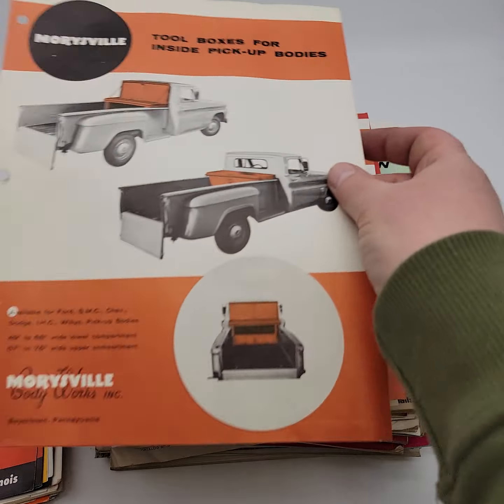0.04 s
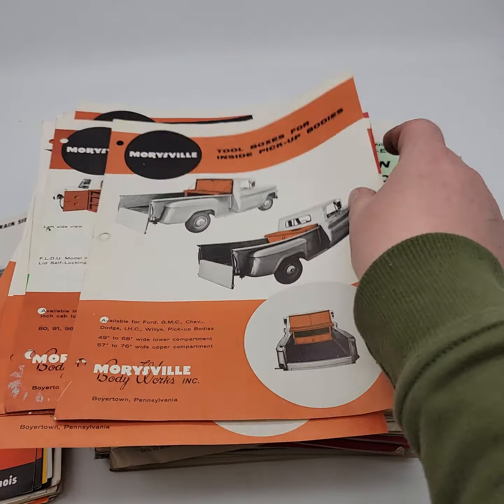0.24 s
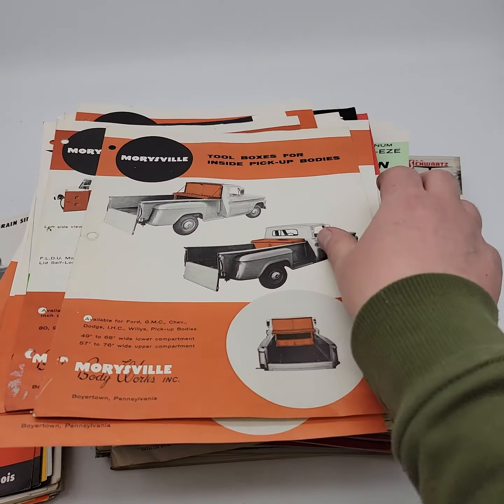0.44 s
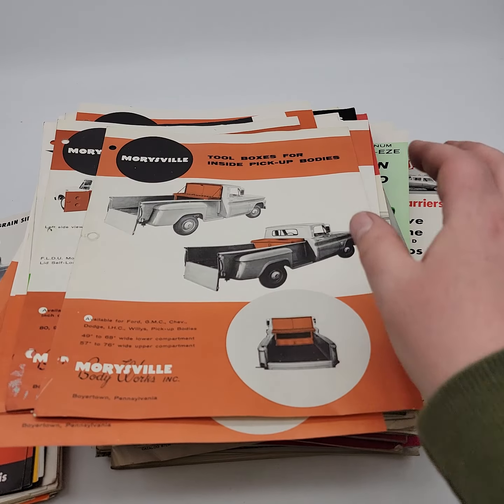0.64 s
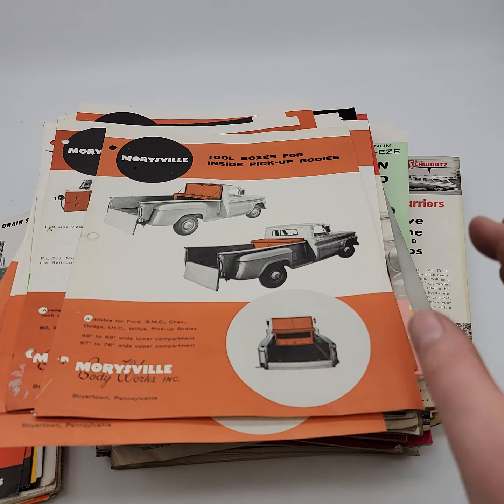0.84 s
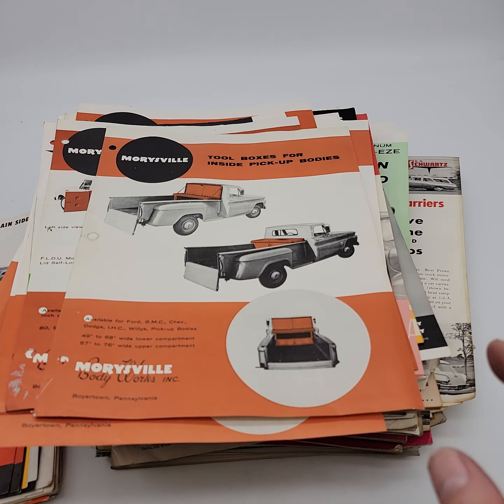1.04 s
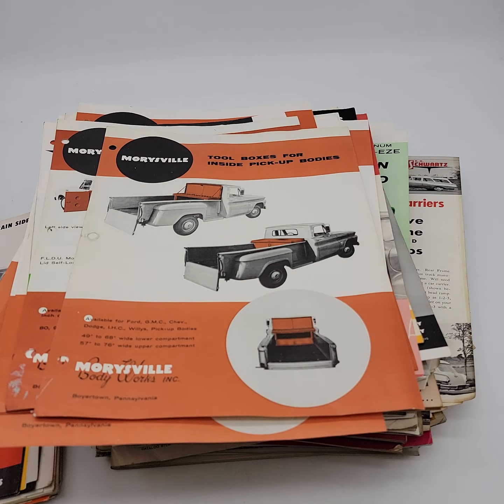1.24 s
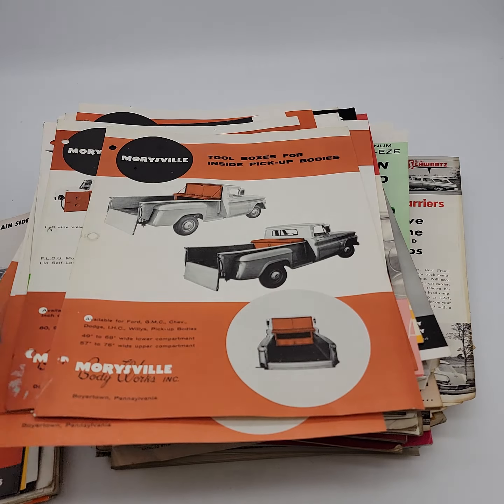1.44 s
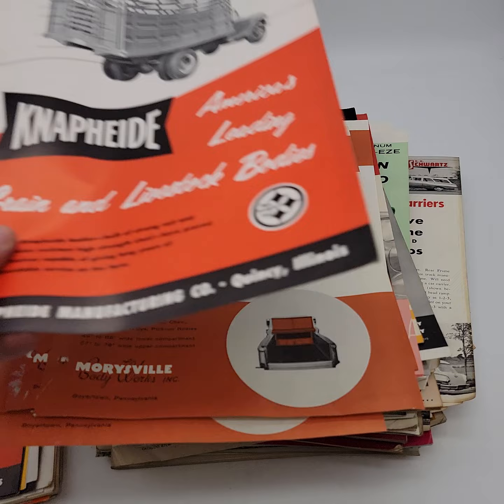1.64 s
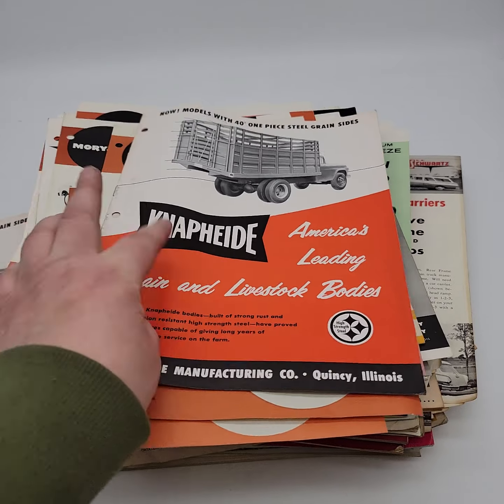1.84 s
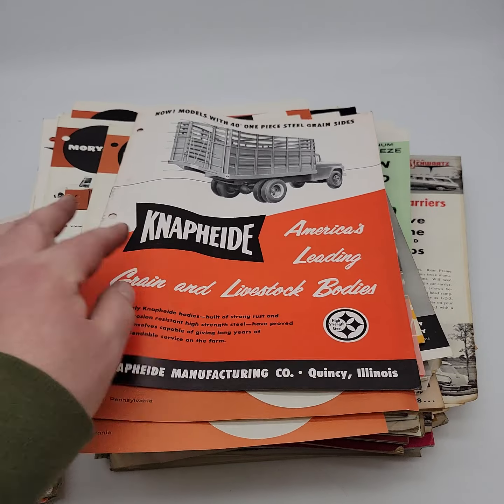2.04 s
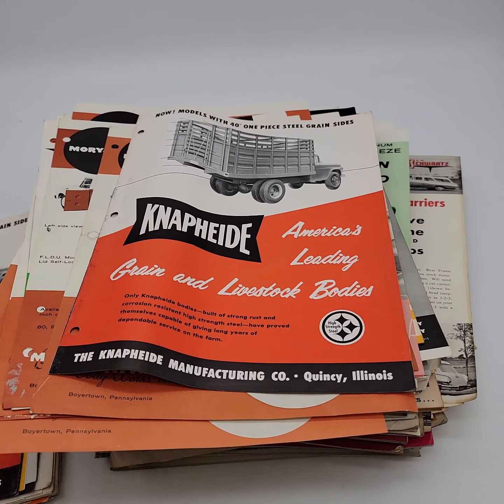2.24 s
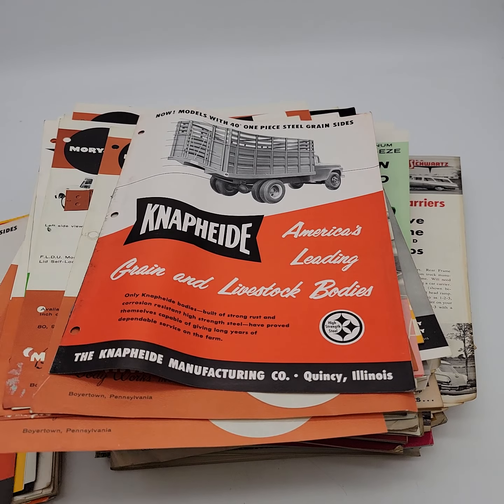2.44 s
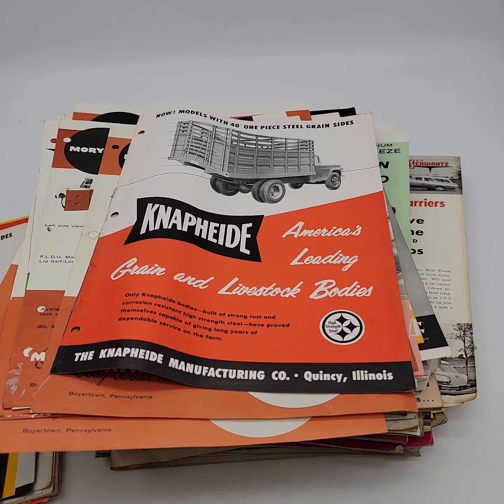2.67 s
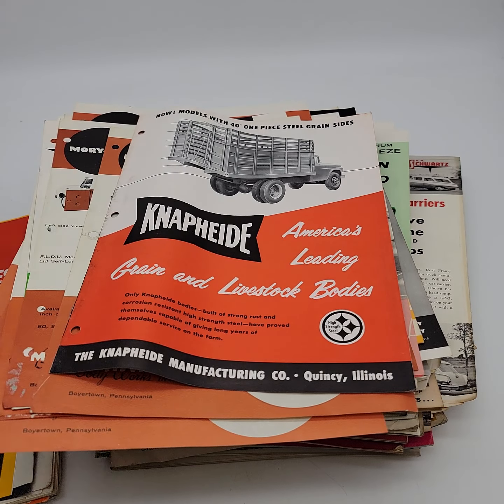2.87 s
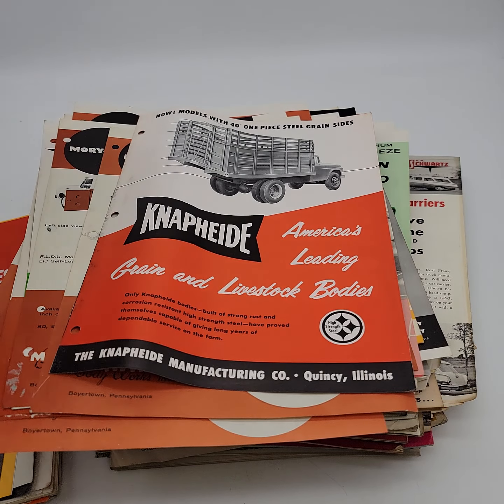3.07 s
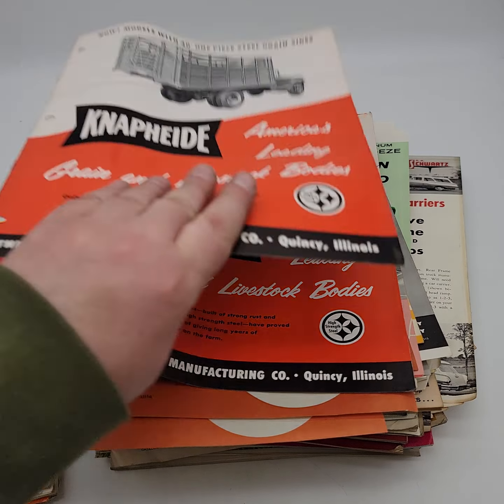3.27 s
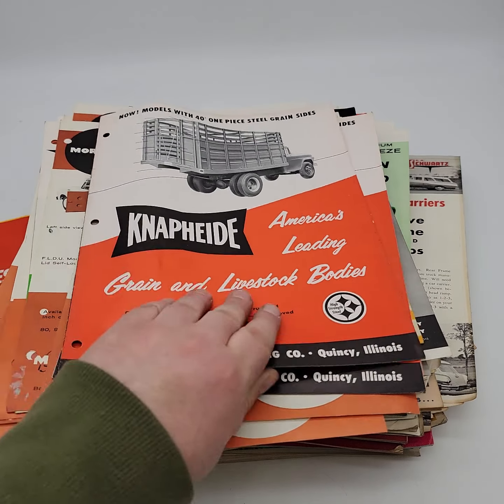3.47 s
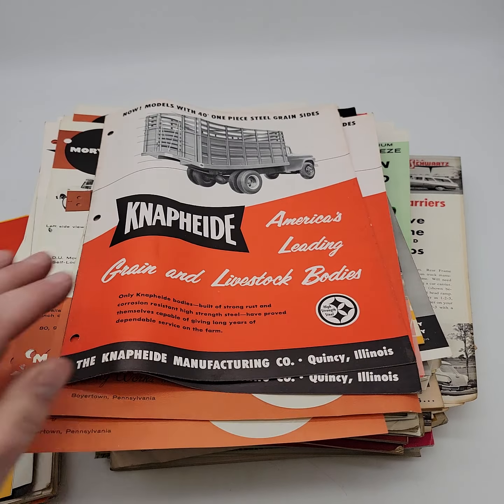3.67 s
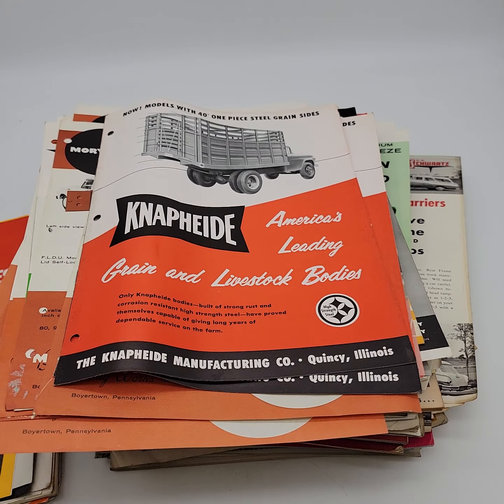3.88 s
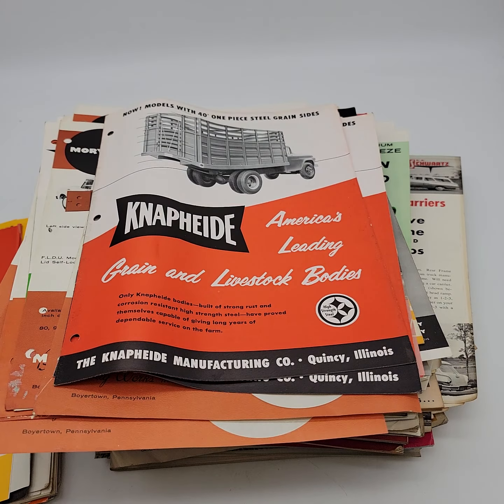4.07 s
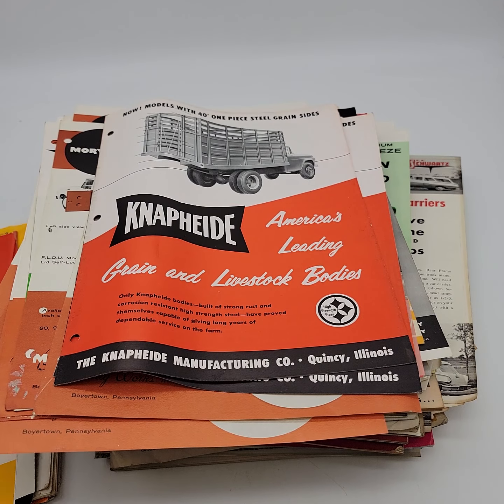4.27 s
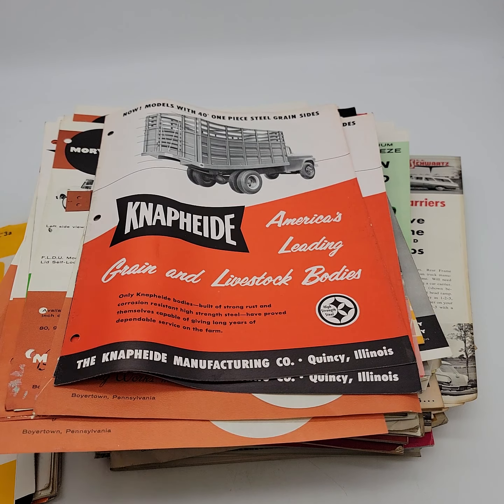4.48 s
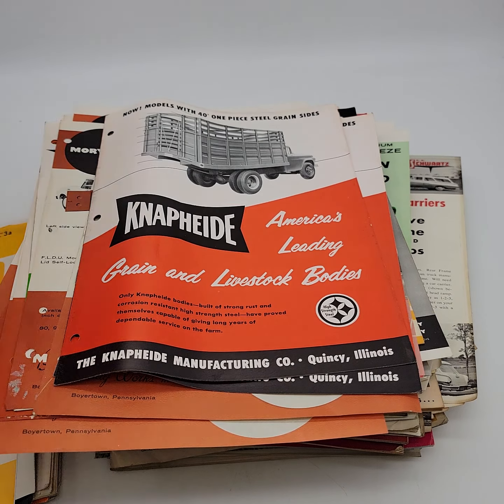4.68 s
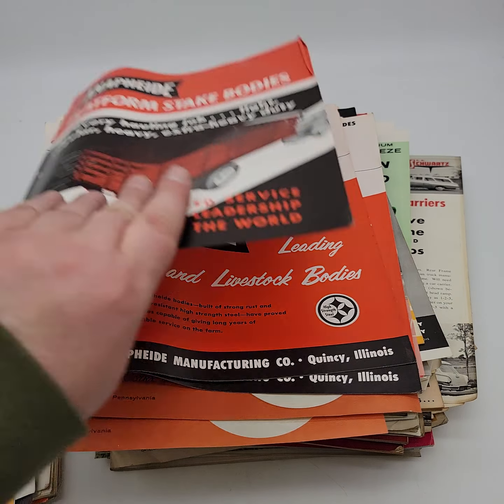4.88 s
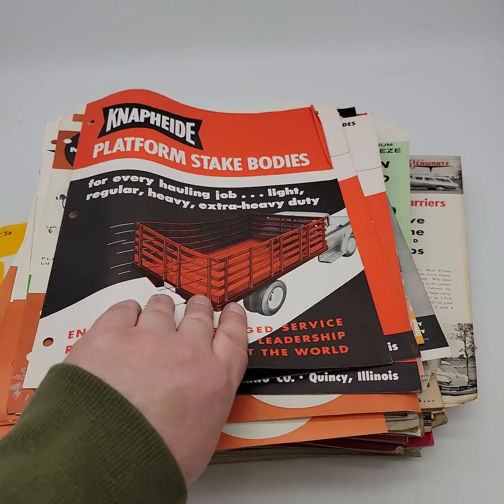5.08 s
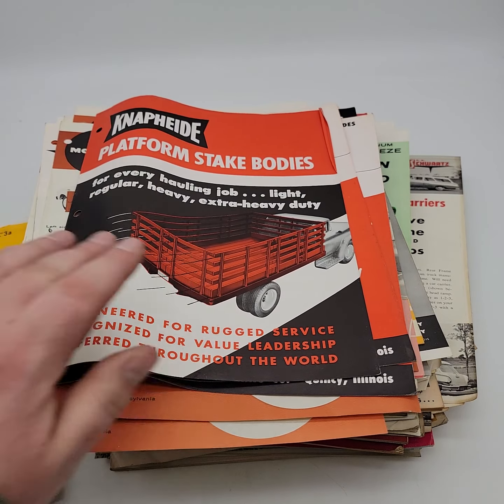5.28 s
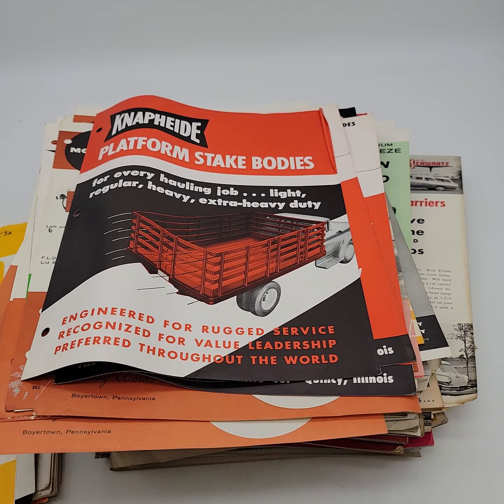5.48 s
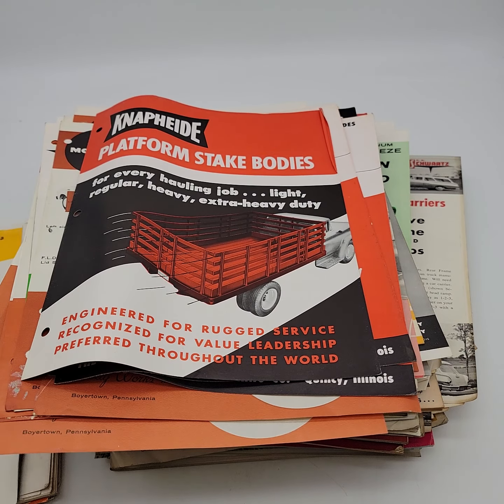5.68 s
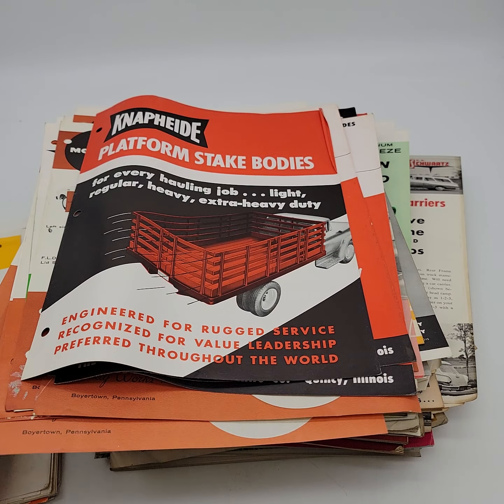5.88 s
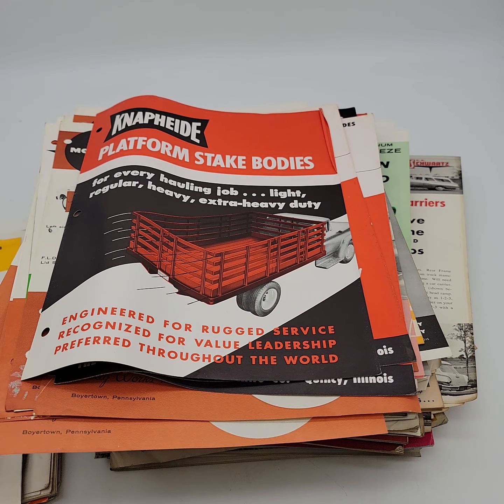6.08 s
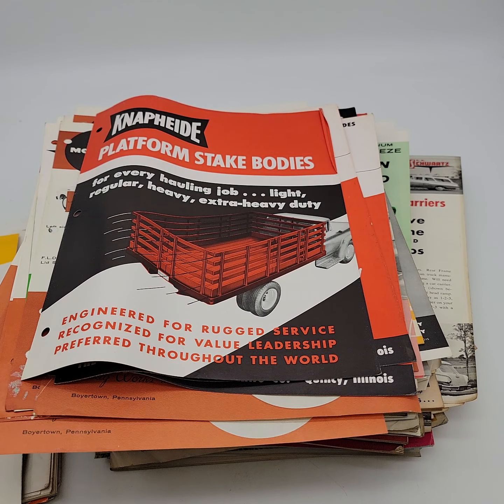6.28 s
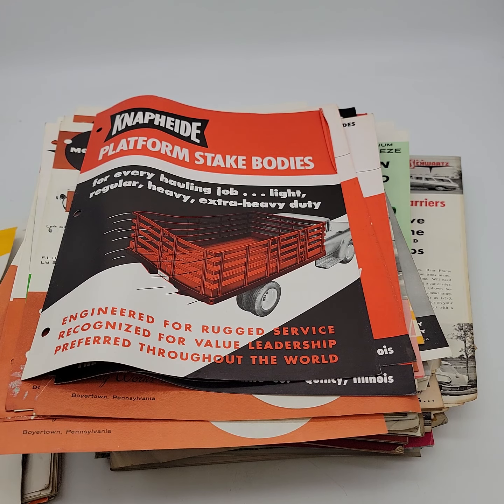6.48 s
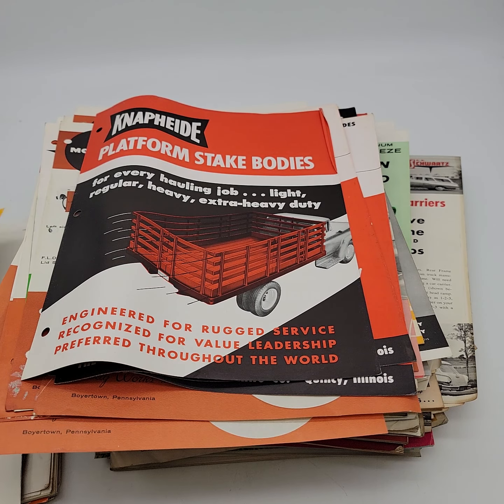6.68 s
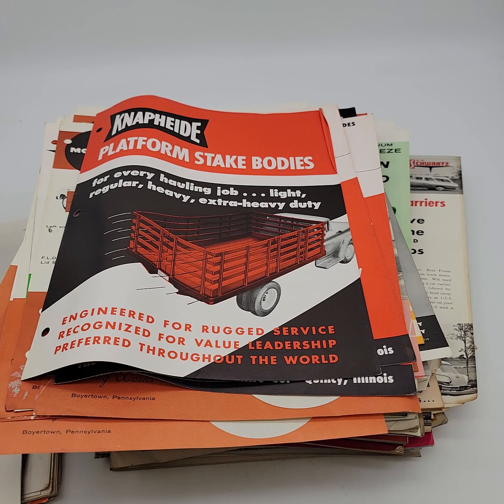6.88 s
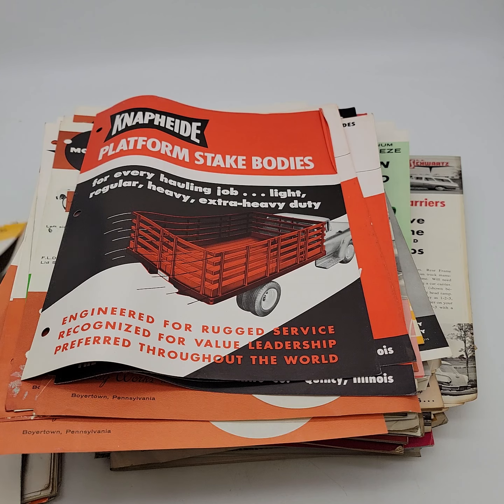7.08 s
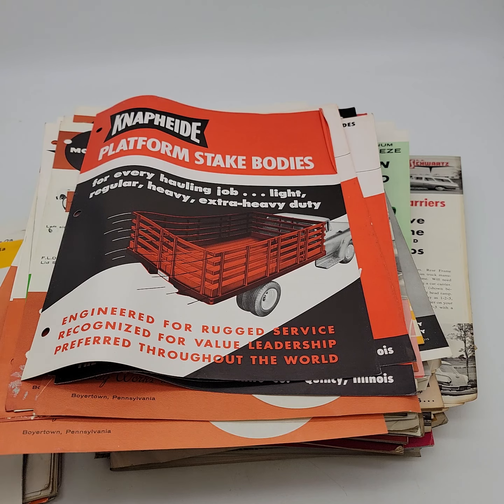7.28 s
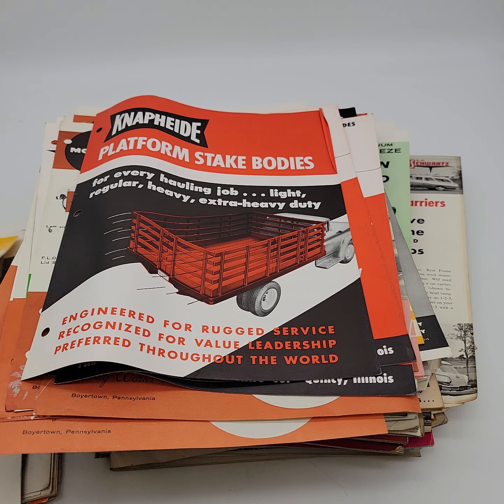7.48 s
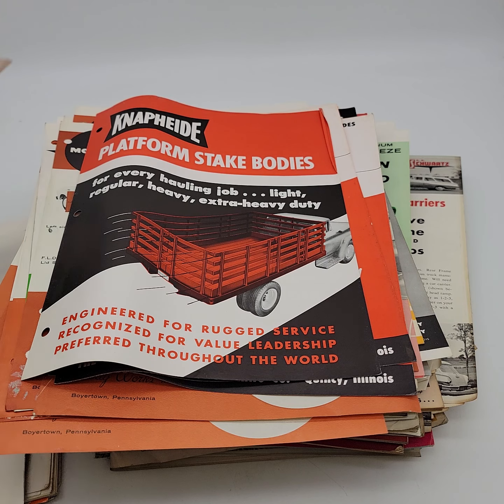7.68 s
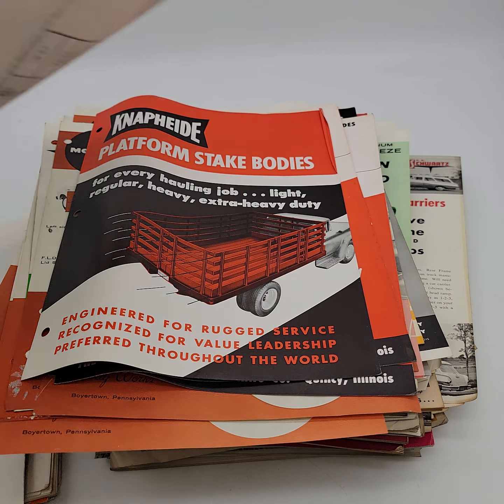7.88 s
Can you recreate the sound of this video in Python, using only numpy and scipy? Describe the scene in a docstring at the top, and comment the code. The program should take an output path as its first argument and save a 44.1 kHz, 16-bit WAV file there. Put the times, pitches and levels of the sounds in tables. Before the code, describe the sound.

Close paper handling indoors: dry sheets hiss and crackle, buckle with crisp snaps, pat down softly, and keep sliding over a faint low rumble.

```python
"""Stiff old paper brochures are picked up, flexed and laid on a pile on a table in a quiet room.
From the start sheets slide with a fine hiss (noise swelling and fading in strokes), buckle with snaps
(noise bursts around a sheet pitch) and pat down with soft thumps (low puffs), over a low rumble and faint hum.
The sharpest snaps come near 2.1 and 3.6 s; from 2.0 to 5.7 s something small and hard ticks now and then
(clicks with ringing modes). Sliding and weaker buckles go on to the end; snaps and ticks echo in the room."""
import sys
import numpy as np
from scipy import signal
from scipy.fft import rfft, irfft
from scipy.io import wavfile

SR = 44100
rng = np.random.default_rng(int(sys.argv[2]) if len(sys.argv) > 2 else 0)


def unload_wav(signal):
    """Save mono or channel-first audio to the path in sys.argv[1] as 16-bit WAV at rate SR, clipped to [-1, 1]."""
    wavfile.write(
        sys.argv[1],
        SR,
        np.round(np.clip(np.atleast_2d(signal).T, -1, 1) * 32767).astype(np.int16),
    )


N = 349272

# Spectrum of the room tone: (frequency [Hz], relative level [dB])
ROOM_SPECTRUM = [(18, -46), (30, -27), (60, -8.5), (85, -9.5), (150, -19), (300, -21.5), (500, -32.5),
                 (900, -33), (2000, -34.5), (5000, -36), (7500, -38), (8300, -46.5), (11000, -43),
                 (13300, -33), (16000, -42.5)]
# Faint wavering hum: (mean frequency [Hz], middle rms level [dB])
HUM_TONES = [(121, -78), (240, -84)]
# Correlation between the sides in the wide noises: (frequency [Hz], correlation [-1 to 1])
SIDE_CORRELATION = [(60, 1), (180, 0.68), (550, 0.98), (1650, 0.047), (4970, 0.19), (15000, -0.12)]
# Small hard ticks: (time [s], relative click level [dB], relative drive of the highest mode [dB])
TICK_EVENTS = [(1.9704, -55.5, -15), (2.3085, -54.5, -5), (3.6736, -53.5, -11), (3.7479, -52, 2),
               (4.0652, -51.5, -4), (5.3954, -59, 1.5), (5.7184, -53.5, -4)]
# Modes that a tick sets ringing: (frequency [Hz], relative level [dB], 60 dB decay time [s])
TICK_MODES = [(239, -10.5, 0.86), (547, -13, 0.19), (3233, 0, 0.058), (9050, -19, 0.08)]
# Spectrum of sliding paper: (frequency [Hz], relative level [dB])
SLIDE_SPECTRUM = [(650, -36), (1100, -13), (1500, -9), (2000, -6.5), (3200, -7.5), (4300, -7), (5200, -14),
                  (6500, -31.5)]
# Spectrum of the finest hiss: (frequency [Hz], relative level [dB])
FINE_SPECTRUM = [(4000, -33.5), (5200, -3.5), (7300, -1.5), (8200, -10.5), (10000, -9), (13000, -6.5),
                 (16000, -2.5)]
# Spectrum of flexing paper: (frequency [Hz], relative level [dB])
FLEX_SPECTRUM = [(120, -11.5), (250, -5), (500, 6), (900, -4.5), (1500, -10.5), (2500, -33.5)]
# Strokes of a sheet over another: (start [s], length [s], sliding hiss level [dB], finest hiss level [dB],
# flexing rustle level [dB], swell from start to end [dB], left over right [dB])
STROKES = [(0.0, 0.039, -69, -81, -48.5, -31, -2), (0.046, 0.22, -60, -62.5, -58.5, 6, 0.5),
           (0.281, 0.055, -58, -64, -74, 4, 1), (.33, 0.097, -55.5, -55.5, -63.5, -7.5, -0.5),
           (0.414, 0.12, -69, -65, -63.5, -12, -3), (0.51, 0.12, -63, -65.5, -72, 4, -3),
           (0.653, 0.043, -70, -66, -83, -6, -2), (0.76, .11, -68, -68, -64.5, -4, -3),
           (0.969, .07, -59, -59, -67.5, -1, -2.5), (1.037, 0.21, -50.5, -54.5, -61, 4.5, -0.5),
           (1.269, 0.037, -72, -63, -59, 14, -1), (1.33, 0.12, -80, -94, -64, -23, -5),
           (1.469, 0.12, -68, -68.5, -70, -14, -1), (1.703, 0.078, -60, -60, -61.5, 0, 2),
           (1.796, 0.12, -56, -57, -53, -12, -7.5), (1.966, 0.086, -64, -64, -66, -8, 0),
           (2.354, .16, -59.5, -53.5, -70.5, -8.5, -0.5), (2.526, 0.25, -59.5, -57, -63, 6.5, -2.5),
           (2.743, 0.12, -55.5, -72, -59, -13, -5), (2.84, 0.12, -61.5, -60, -69, -12, 3.5),
           (3.072, 0.1, -58.5, -70, -63, 3, 1), (3.226, 0.037, -61, -67.5, -67, -1, 1),
           (3.363, 0.23, -58, -58, -63.5, 2, 2.5), (3.543, 0.24, -62, -77, -62.5, -28, -6.5),
           (3.929, 0.15, -54, -56.5, -60, -7.5, -1.5), (4.06, .15, -61, -61.5, -70.5, -1, 0),
           (4.221, .16, -62, -61, -67, 1.5, -2.5), (4.424, 0.098, -53.5, -56.5, -72.5, 7.5, -1.5),
           (4.547, 0.14, -74, -76.5, -75.5, -4.5, -5), (4.859, .07, -71, -70, -82, 4.5, 2.5),
           (4.937, 0.18, -64.5, -56.5, -59, 0.5, 1), (5.13, 0.08, -53.5, -56.5, -69, 0.5, 1),
           (5.305, 0.137, -88.5, -88, -67, 3, -2), (5.567, 0.1, -54, -53.5, -64.5, -5, 0.5),
           (5.688, 0.087, -63, -64, -69, -12, -1.5), (5.781, .15, -58.5, -59.5, -66, -1.5, -0.5),
           (5.933, 0.1, -68.5, -67.5, -73.5, -9, -1), (6.172, 0.17, -65, -61.5, -71.5, 4.5, -2),
           (6.304, 0.15, -55.5, -58.5, -58.5, -17.5, -2.5), (6.448, 0.19, -64, -64, -64.5, -10.5, -1.5),
           (6.623, 0.079, -56.5, -57, -75, -11, 0), (6.699, 0.144, -52, -53.5, -70, 4.5, -1),
           (6.836, 0.1, -47, -56.5, -63.5, -7, -2.5), (6.94, 0.18, -52.5, -58.5, -61.5, -16.5, 0),
           (7.126, 0.073, -53, -56.5, -69, -5, 1), (7.203, 0.17, -52.5, -56, -63, -4, -0.5),
           (7.397, 0.13, -54, -63, -62, -1, -1.5), (7.538, 0.1, -47, -49, -64, 3, 0),
           (7.671, 0.17, -67.5, -67.5, -66, -2.5, -2.5)]
# Spectrum of the crisp edge of a snap: (frequency [Hz], relative level [dB])
EDGE_SPECTRUM = [(4000, -6.5), (5200, -7.5), (7000, -6), (8500, -19.5), (11000, -23.5), (13500, -10.5),
                 (16000, -23.5)]
# Buckles and pats: (peak time [s], sheet level [dB], sheet pitch [Hz], crack level [dB], edge level [dB],
# puff level [dB], rise time [s], basic 60 dB decay time [s], left over right [dB])
BUCKLES = [(0.0843, -43, 640, -75, -76, -48.5, 0.024, 0.16, 2.5),
           (0.145, -77, 990, -52.5, -60, -75, 0.014, 0.073, -4),
           (0.2149, -34.5, 1460, -51, -67, -45, .016, .085, 0.5),
           (0.609, -52, 980, -52.5, -55, -58, 0.014, 0.046, 0),
           (0.8113, -38, 610, -46.5, -46, -54, 0.0058, 0.042, -0.5),
           (0.8687, -53, 600, -59, -69, -62, .0051, .022, -6),
           (1.1415, -30, 594, -58, -41, -39, 0.0075, 0.028, 1.5),
           (1.2253, -27, 656, -34, -42.5, -41, 0.0027, 0.047, -4.5),
           (1.2268, -26, 1540, -48, -60, -66, 0.00177, 0.032, -3),
           (1.2788, -47, 580, -74, -72, -44, 0.0032, 0.031, -2),
           (1.3256, -34.5, 1050, -57.5, -75, -38.5, 0.0087, 0.1, -1),
           (1.49, -49, 826, -79, -70, -49.5, .0027, 0.064, 2),
           (1.707, -50, 1410, -51.5, -48.5, -61, .0034, 0.063, 2.5),
           (1.7489, -39, 1530, -51, -70, -55, 0.0091, 0.071, 1.5),
           (1.8001, -41, 1170, -46.5, -43, -68, 0.015, 0.059, 3.5),
           (1.8162, -30, 1470, -54, -59, -45, 0.0056, 0.1, 2),
           (1.8418, -50, 1170, -42, -47, -48, 0.012, 0.11, 5),
           (1.8729, -25, 1590, -42, -30.5, -30, 0.021, 0.047, 1),
           (1.9148, -43, 1340, -47, -58, -68, .0067, 0.034, 4),
           (2.0231, -41.5, 1380, -78, -60, -47, 0.0043, 0.044, -2),
           (2.0846, -7.5, 1890, -17, -34.5, -31.5, 0.00087, 0.038, 0),
           (2.3696, -34.5, 734, -41.5, -52, -38.5, 0.0055, 0.033, -2.5),
           (2.387, -56, 800, -49, -47, -48, 0.0075, 0.091, -1.5),
           (2.752, -23.5, 1550, -22.5, -27, -35, .004, 0.07, -.5),
           (2.876, -68, 1070, -46.5, -46, -58, .016, 0.18, -5),
           (2.979, -57, 1770, -48.5, -71.5, -62.5, 0.0026, 0.063, -4.5),
           (3.1007, -58, 1190, -70, -59, -67, .013, 0.26, -14),
           (3.1197, -37, 1250, -37.5, -43, -51.5, 0.0096, 0.098, 1.5),
           (3.3537, -34.5, 1460, -47, -48, -38.5, 0.0068, .043, -7),
           (3.3591, -27, 1510, -41, -39, -27.5, 0.0041, 0.12, -4.5),
           (3.3682, -20.5, 1780, -22.5, -54.5, -33.5, .014, 0.057, 3.5),
           (3.425, -40, 1410, -41, -50, -37, 0.0038, .079, -8),
           (3.451, -25, 1680, -24.5, -72, -35.5, 0.0076, 0.055, 2),
           (3.483, -41, 990, -60, -62, -42, 0.0072, 0.018, -5),
           (3.5617, -8.5, 1565, -12.5, -25, -53.5, 0.0015, 0.044, 2.5),
           (3.9425, -38, 1723, -41, -30, -49.5, 0.002, 0.0092, -13),
           (3.9602, -44, 1000, -54, -42.5, -40.5, 0.0095, 0.063, 0.5),
           (3.976, -38, 690, -47, -46, -53, 0.0046, 0.042, -0.5),
           (4.2562, -58, 1260, -60, -55, -56, 0.0069, 0.047, -1),
           (4.4092, -46, 690, -84, -63, -50.5, .0044, 0.15, -5),
           (4.4712, -52, 1250, -53, -45, -61, .013, .08, -2.5),
           (4.9343, -50.5, 1520, -45.5, -45.5, -63.5, 0.00134, 0.05, -0.5),
           (4.9437, -36.5, 1570, -46, -42, -58, 0.0021, 0.085, 2),
           (4.9638, -22, 1700, -30, -28.5, -34, 0.0047, 0.04, -1),
           (5.014, -50, 1470, -45, -56, -54, .013, 0.25, 0),
           (5.0355, -48, 1080, -58, -55, -42, 0.026, 0.027, -7),
           (5.0909, -31, 1800, -34.5, -66, -33.5, 0.0069, 0.057, 2.5),
           (5.1613, -49, 1684, -54.5, -52, -69.5, 0.02, .035, -1.5),
           (5.5697, -75.5, 1220, -47, -55.5, -69, 0.0023, 0.1, -7.5),
           (5.601, -41.5, 1660, -43.5, -40, -57, 0.00084, 0.013, -7),
           (5.6282, -50, 1160, -47.5, -47, -75, .02, 0.094, 1.5),
           (5.8812, -51, 883, -61.5, -45, -68.5, 0.023, 0.1, -1),
           (6.1032, -68.5, 1270, -79, -53, -81, 0.0064, 0.064, 0.5),
           (6.3258, -31.5, 1170, -36, -40.5, -38, 0.012, 0.042, -0.5),
           (6.4942, -45, 725, -64, -47, -45.5, 0.0061, .04, -4),
           (6.5339, -41, 604, -52.5, -48, -48.5, 0.0052, 0.038, -3),
           (6.9425, -21, 1740, -21.5, -39.5, -36, 0.002, 0.083, -2.5),
           (7.144, -56, 1490, -48, -47.5, -49.5, 0.0082, 0.1, -3),
           (7.2203, -59, 1390, -58, -64, -56, 0.016, 0.052, -9),
           (7.3826, -48, 680, -55, -64, -72, 0.0035, 0.064, -7),
           (7.546, -39, 695, -58, -63, -49.5, 0.011, 0.08, -6),
           (7.5716, -44.5, 680, -50, -43, -66, 0.018, 0.11, -4),
           (7.7858, -57, 724, -65, -67, -52, 0.02, .09, -5)]

ROOM_DB = -66.5
ECHO_T60_S, ECHO_DB, WALL_CUT_HZ = 0.26, -21.5, 5300
STROKE_ATTACK_S, STROKE_RELEASE_T60_S = 0.02, 0.12
CRACK_HZ = 3380
MAX_SIDE_LAG_S = 0.00012
PUFF_HZ, PUFF_EXPONENT = 190, 0.45  # puff pitch under a 1 kHz sheet; power of the sheet pitch it follows
JOLT_HEIGHT, JOLT_T60_S = 0.28, 0.016  # brief extra height at the peak of a burst
STOPBAND_HZ = 16300


def from_db(db):
    """Twenty decibels are a factor of ten in amplitude."""
    return 10 ** (np.asarray(db) / 20)


def rms_one(x):
    """Division by the root mean square gives unit power."""
    return x / np.sqrt(np.mean(x ** 2) + 1e-20)


def at_hz(points, hz):
    """A spectrum is interpolated along a logarithmic frequency axis."""
    table = np.array(points)
    return np.interp(np.log(hz), np.log(table[:, 0]), table[:, 1])


def coloured(white, shape):
    """Linear filtering: a spectrum table or a gain rule multiplies the spectrum of the noise."""
    hz = np.fft.rfftfreq(white.shape[-1], 1 / SR) + 1
    gain = shape(hz) if callable(shape) else from_db(at_hz(shape, hz))
    return irfft(rfft(white) * gain, white.shape[-1])


def resonance(pitch, sharp, skirt_db, low_hz):
    """Resonance: the gain falls steeply on both sides of the pitch, with a shoulder below it."""
    def gain(hz):
        peak = 1 / (1 + (sharp * (hz / pitch - pitch / hz)) ** 4)
        shoulder = from_db(skirt_db) / (1 + (hz / pitch) ** 4 + (low_hz / hz) ** 4)
        return peak + shoulder
    return gain


def drift(rate_hz):
    """Random modulation: low-passed noise of unit rms wanders slowly about zero."""
    step = 40  # samples between the points of the slow curve
    pole = np.exp(-2 * np.pi * rate_hz * step / SR)
    white = rng.standard_normal(N // step + 2002)
    slow = signal.lfilter([1], [1, -2 * pole, pole * pole], white)[2000:]  # drop the onset
    return np.interp(np.arange(N) / step, np.arange(len(slow)), rms_one(slow))


def wide_noise(spectrum, grain_db, patchy_db):
    """Partial coherence: correlation varies with frequency, while narrow bands swell and fade."""
    hz = np.fft.rfftfreq(N, 1 / SR) + 1
    correlation = np.clip(at_hz(SIDE_CORRELATION, hz), -1, 1)
    mid, side = rfft(rng.standard_normal((2, N))) * from_db(at_hz(spectrum, hz))
    pair = np.sqrt(1 + correlation) * mid + np.sqrt(1 - correlation) * side * [[1], [-1]]

    # Bands of 1/11 octave are dealt at random to five swells.
    band = (11 * np.log2(hz)).astype(int)
    swell_of_bin = rng.integers(0, 5, 200)[band]
    out = np.zeros((2, N))
    for k in range(5):
        swell = from_db(patchy_db * drift(5))
        out += irfft(pair * (swell_of_bin == k), N) * swell
    grain = from_db(grain_db * (drift(13) + drift(53)))
    return rms_one(out * grain)


def burst(noise, rise, t60, level_db):
    """Transient excitation: a quadratic rise and exponential decay set the energy of the noise."""
    t = np.arange(noise.shape[-1]) / SR
    decay = from_db(-60 * np.maximum(t - rise, 0) / max(t60, 0.01))
    envelope = np.minimum(t / rise, 1) ** 2 * decay
    jolt = JOLT_HEIGHT * from_db(-60 * np.abs(t - rise) / JOLT_T60_S)
    envelope *= (1 + jolt) / (1 + JOLT_HEIGHT)
    shaped = noise * envelope
    energy_match = np.sqrt(np.mean(envelope ** 2) / np.mean(shaped ** 2) / 2)
    return from_db(level_db) * shaped * energy_match


def room_tone():
    """Stationary background: low rumble and faint hiss, with a hum wavering in level and pitch."""
    out = from_db(ROOM_DB) * wide_noise(ROOM_SPECTRUM, grain_db=0.6, patchy_db=1.6)
    for hz, level_db in HUM_TONES:
        wavering_hz = hz * (1 + 0.02 * drift(4))
        phase = 2 * np.pi * np.cumsum(wavering_hz) / SR
        level = from_db(level_db + 3 * drift(4))
        out += np.sqrt(2) * level * np.sin(phase)  # root 2: from rms to peak
    return out


def echoes(x):
    """Diffuse reverberation: convolution with decaying noise, duller than the direct sound, one per side."""
    t = np.arange(SR // 2) / SR
    envelope = from_db(-60 * t / ECHO_T60_S) * np.minimum(t / 0.007, 1)
    tail = rng.standard_normal((2, len(t))) * envelope
    wall_loss = signal.butter(1, WALL_CUT_HZ, fs=SR, output="sos")
    tail = signal.sosfilt(wall_loss, tail)
    tail /= np.sqrt(np.sum(tail ** 2, axis=1, keepdims=True))  # unit energy per side
    return from_db(ECHO_DB) * signal.fftconvolve(x, tail, axes=1)[:, :N]


def ring(x, hz, t60):
    """Damped oscillator: a unit click excites a decaying sine of starting height 1."""
    radius, angle = from_db(-60 / (t60 * SR)), 2 * np.pi * hz / SR
    feedback = [1, -2 * radius * np.cos(angle), radius * radius]
    return signal.lfilter([0, np.sin(angle)], feedback, x + 1e-18)


def ticks():
    """Impulsive modal excitation: a small hard click rattles briefly and rings, louder on the right."""
    s, level_db, high_db = np.transpose(TICK_EVENTS)
    at = np.round(s * SR).astype(int)
    clicks, high_clicks = np.zeros((2, N)) + 1e-18  # tiny offset avoids vanishing numbers in the filters
    clicks[at] = from_db(level_db + 2.0)
    high_clicks[at] = from_db(level_db + 9.5 + high_db)

    rattle = burst(coloured(rng.standard_normal(2048), SLIDE_SPECTRUM), 0.0004, 0.04, 2.1)
    out = 2.4 * signal.lfilter([0.4], [1, -0.6], clicks)
    out += signal.fftconvolve(clicks, rattle)[:N]
    for hz, mode_db, t60 in TICK_MODES:
        drive = high_clicks if hz > 6000 else clicks
        out += from_db(mode_db) * ring(drive, hz, t60)
    return out * from_db([[-2.5], [2.5]])


def crackle(per_s):
    """Stick-slip: fibres catch and let go in clumped clicks of uneven size, offset between the sides."""
    born = rng.random(N) < per_s * from_db(6.0 * drift(12)) / SR
    sizes = from_db(4.0 * np.minimum(rng.exponential(1, N), 4))
    clicks = born * sizes * rng.choice([-1, 1], N)
    pair = np.array([clicks, np.roll(clicks, 7)])
    return rms_one(coloured(pair, SLIDE_SPECTRUM))


def stroke_gains():
    """Incoherent addition: strokes set in, swell or fade and let go; overlaps add in power."""
    power, t = np.zeros((3, 2, N)), np.arange(SR) / SR
    for s, length, hiss_db, fine_db, rustle_db, swell_db, pan_db in STROKES:
        swell = swell_db * (np.minimum(t / length, 1) - 0.5)
        release = -60 * np.maximum(t - length, 0) / STROKE_RELEASE_T60_S
        shape = np.minimum(t / STROKE_ATTACK_S, 1) * from_db(swell + release)
        sides = shape * from_db([[pan_db / 2], [-pan_db / 2]])
        layers = from_db([hiss_db, fine_db, rustle_db])[:, None, None] * sides
        at = max(round(s * SR), 0)
        power[..., at:at + SR] += (layers ** 2)[..., :N - at]
    return np.sqrt(power)


def sliding():
    """Friction noise: paper fibres drag over each other, and slower flexing rustles lower down."""
    hiss, fine, rustle = stroke_gains()
    drag = 0.87 * wide_noise(SLIDE_SPECTRUM, grain_db=2.0, patchy_db=3.5)
    drag += 0.45 * crackle(per_s=600)
    paper = hiss * drag
    paper += rustle * wide_noise(FLEX_SPECTRUM, grain_db=2.0, patchy_db=3.5)
    paper += fine * wide_noise(FINE_SPECTRUM, grain_db=1.6, patchy_db=0.5)
    return paper


def snaps():
    """Buckling: the sheet shakes around its pitch, with a crack, a crisp edge and a puff of trapped air."""
    size = 8192
    crack_rule = resonance(CRACK_HZ, sharp=1.6, skirt_db=-20, low_hz=885)
    out = np.zeros((2, N + size))
    for s, sheet_db, pitch, crack_db, edge_db, puff_db, rise, t60, pan_db in BUCKLES:
        rise = max(rise, 5e-4)
        white = rng.standard_normal((4, size))
        pair = white[0] + 1.5 * white[1:3]  # each side hears a slightly different part of the sheet

        sheet_rule = resonance(pitch, sharp=1.49, skirt_db=-9.5, low_hz=0.4 * pitch)
        sound = burst(coloured(pair, sheet_rule), rise, t60, sheet_db)
        sound += burst(coloured(pair, crack_rule), rise, t60, crack_db)
        sound += burst(coloured(pair, EDGE_SPECTRUM), rise, 1.2 * t60, edge_db)
        lag = round(rng.uniform(-1, 1) * MAX_SIDE_LAG_S * SR)
        sound[1] = np.roll(sound[1], lag)

        # The puff is the same on both sides and peaks a little later.
        puff_hz = PUFF_HZ * (pitch / 1e3) ** PUFF_EXPONENT
        puff_rule = resonance(puff_hz, sharp=0.64, skirt_db=-7.5, low_hz=55)
        sound += burst(coloured(white[3], puff_rule), rise + 0.0017, 0.013 + t60, puff_db)

        at = round((s - rise) * SR)
        out[:, at:at + size] += sound * from_db([[pan_db / 2], [-pan_db / 2]])
    return out[:, :N]


def scene():
    """Superposition: room tone, sliding paper, and the snaps and ticks with their echoes."""
    hits = ticks() + snaps()
    return room_tone() + echoes(hits) + sliding() + hits


def record(dry):
    """Band limiting: a steep low-pass filter removes the top of the spectrum."""
    low_pass = signal.cheby2(12, 50, STOPBAND_HZ, fs=SR, output="sos")
    return signal.sosfilt(low_pass, dry)


dry = scene()
out = record(dry)
unload_wav(out)
```